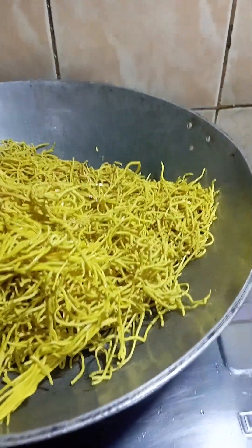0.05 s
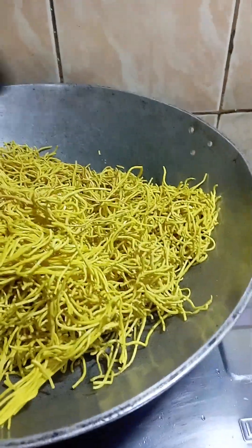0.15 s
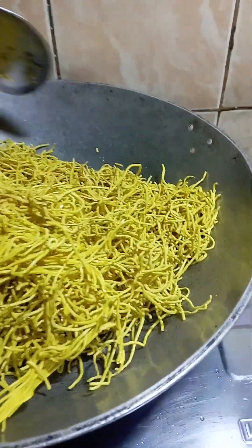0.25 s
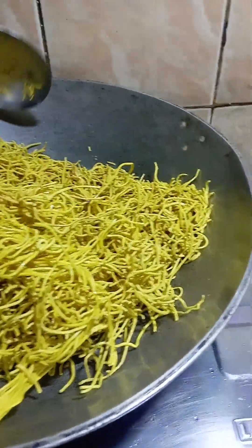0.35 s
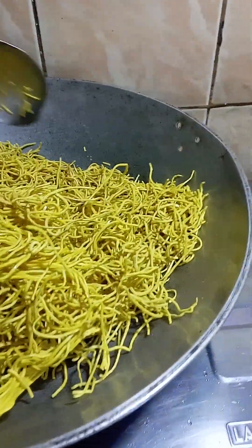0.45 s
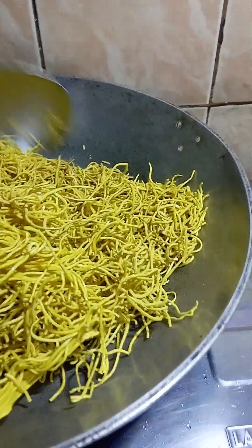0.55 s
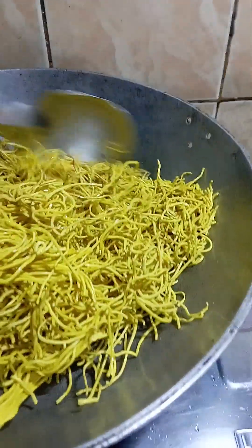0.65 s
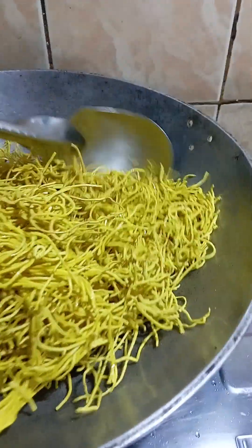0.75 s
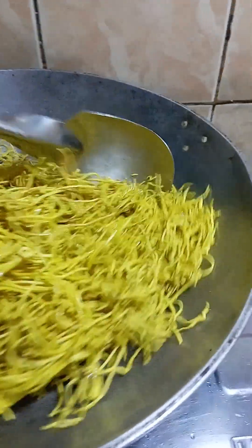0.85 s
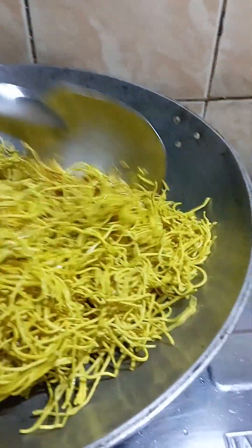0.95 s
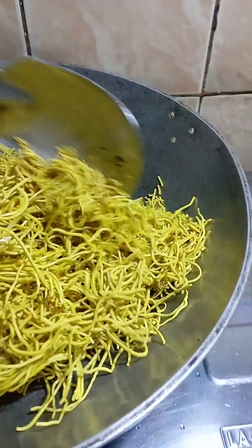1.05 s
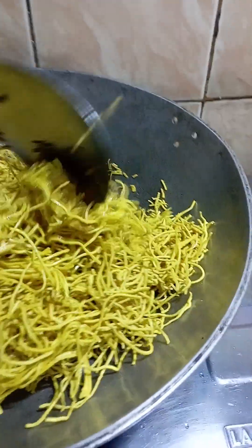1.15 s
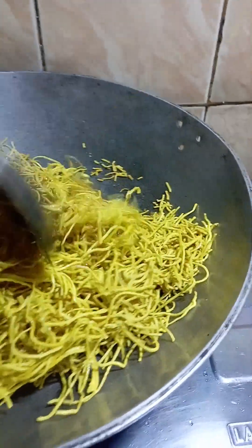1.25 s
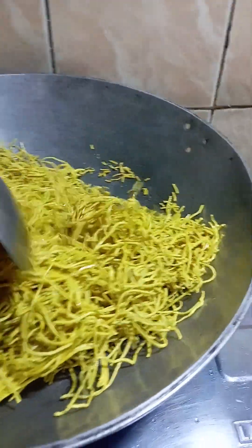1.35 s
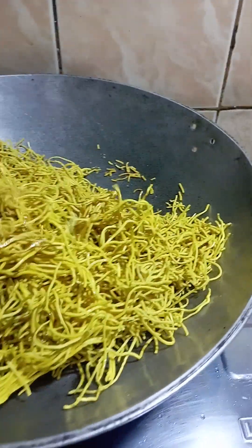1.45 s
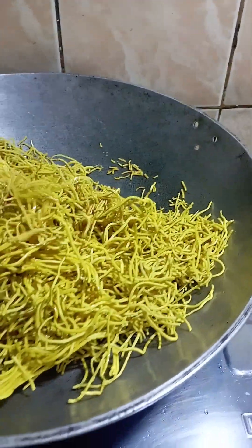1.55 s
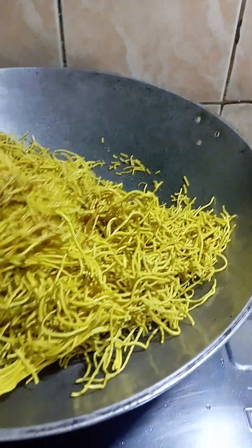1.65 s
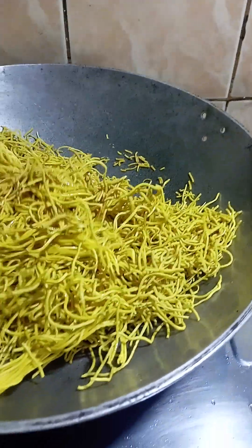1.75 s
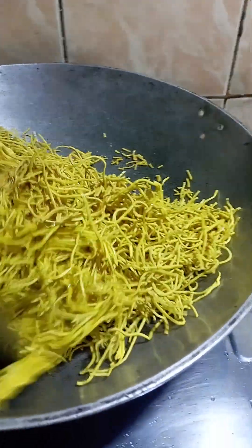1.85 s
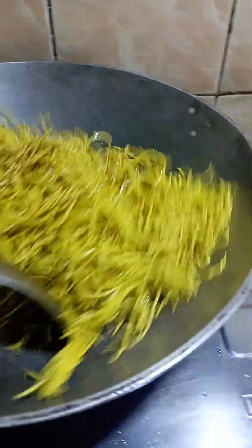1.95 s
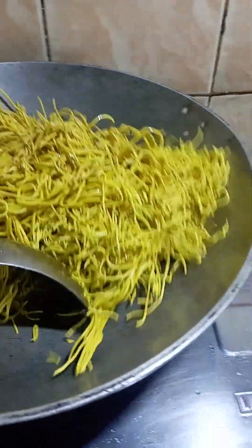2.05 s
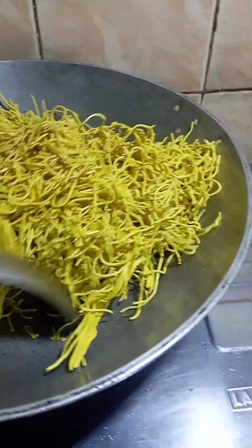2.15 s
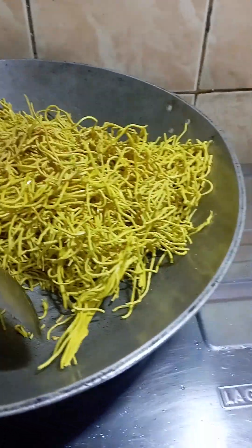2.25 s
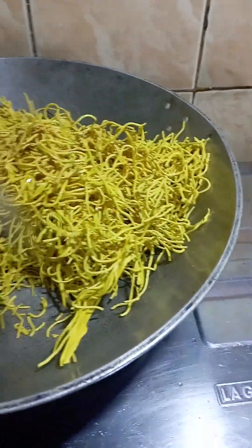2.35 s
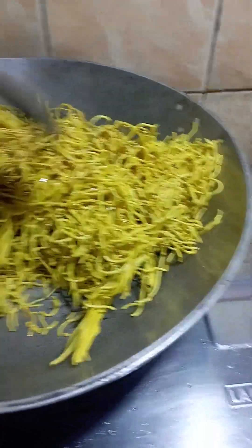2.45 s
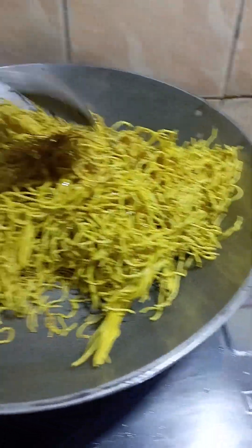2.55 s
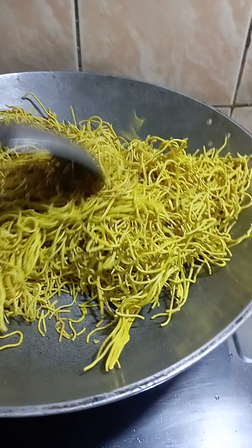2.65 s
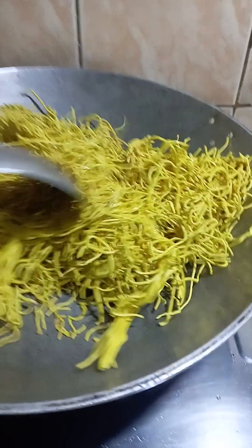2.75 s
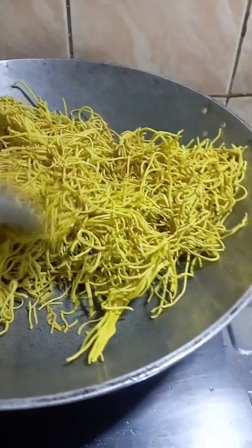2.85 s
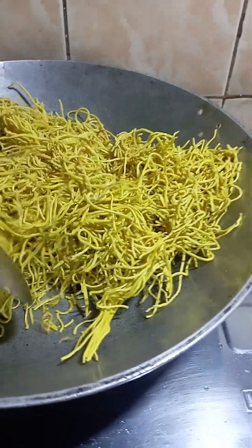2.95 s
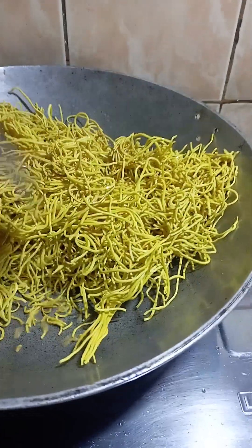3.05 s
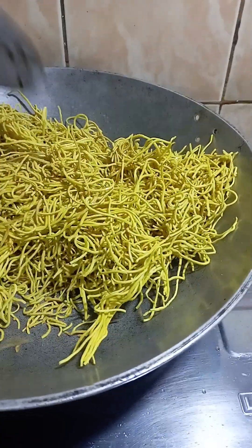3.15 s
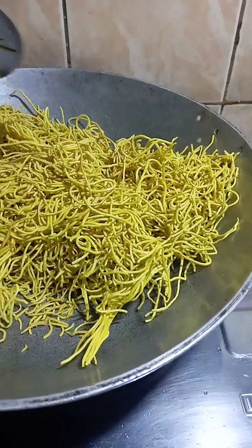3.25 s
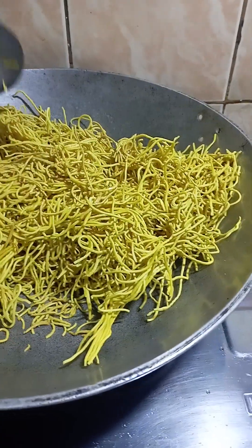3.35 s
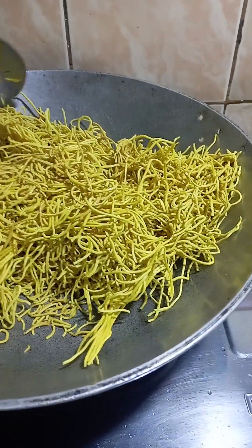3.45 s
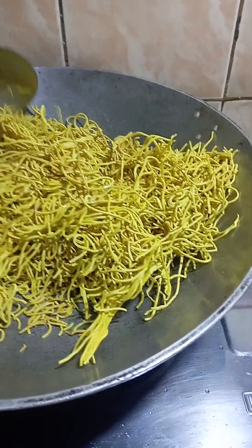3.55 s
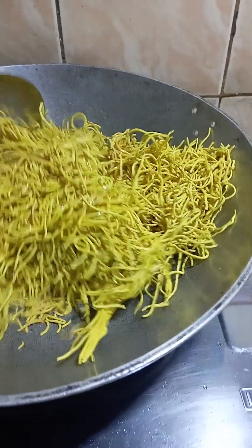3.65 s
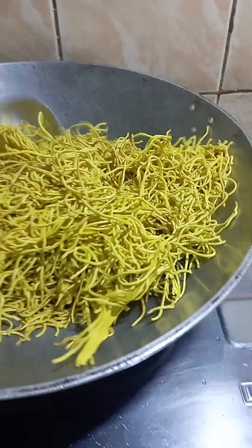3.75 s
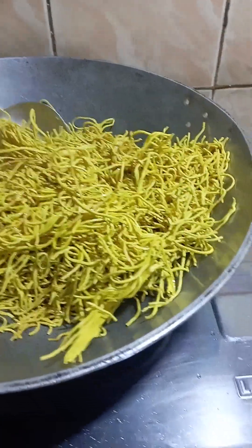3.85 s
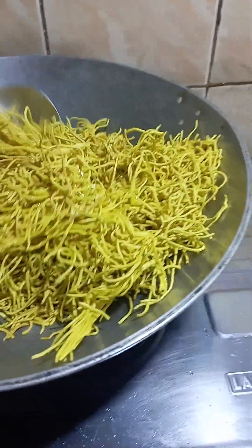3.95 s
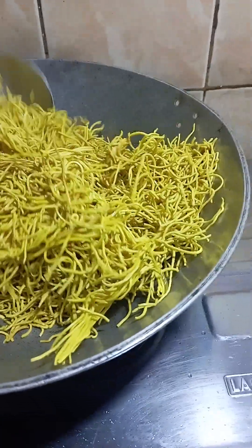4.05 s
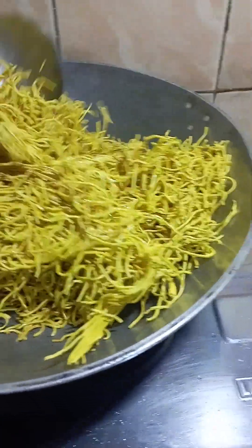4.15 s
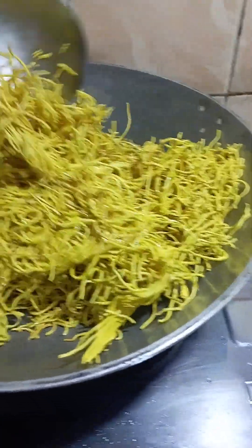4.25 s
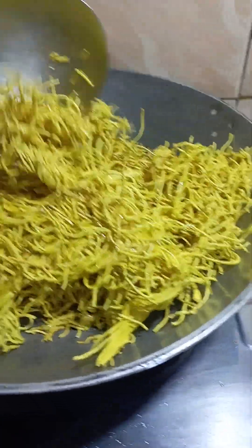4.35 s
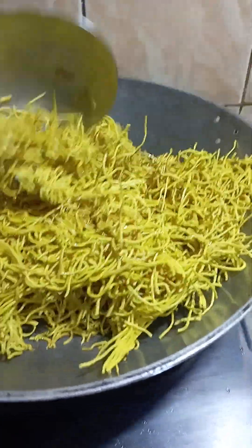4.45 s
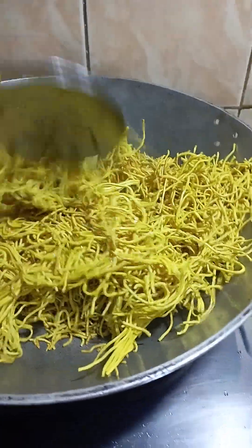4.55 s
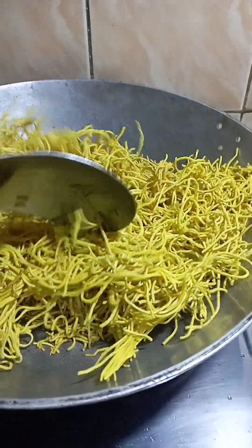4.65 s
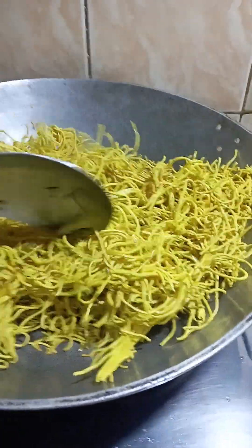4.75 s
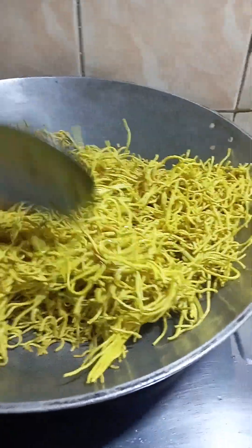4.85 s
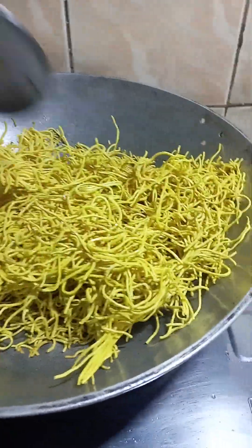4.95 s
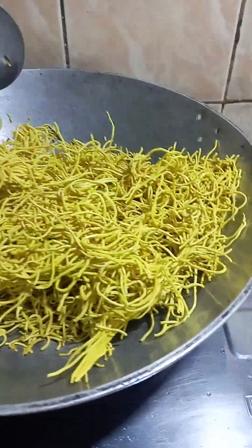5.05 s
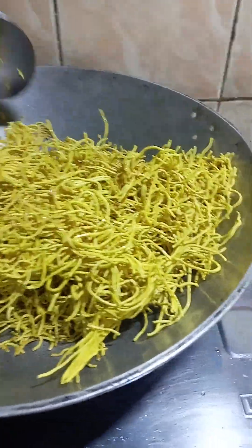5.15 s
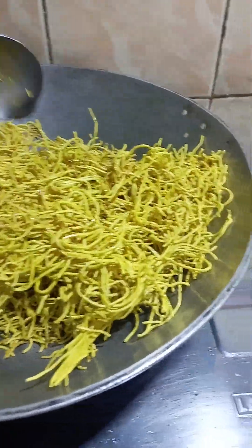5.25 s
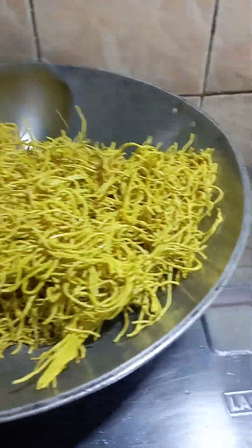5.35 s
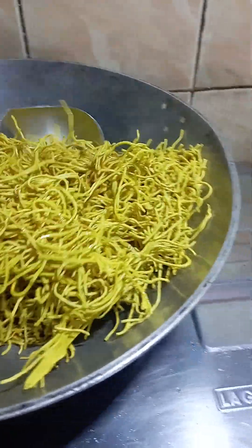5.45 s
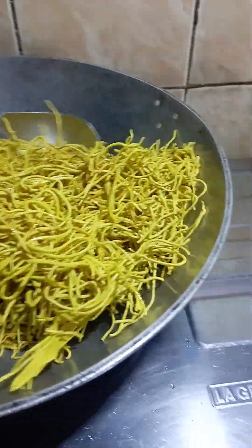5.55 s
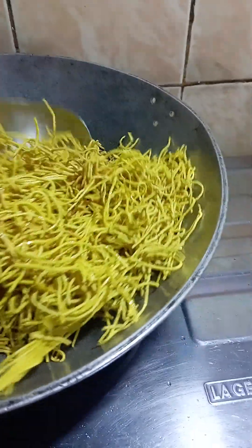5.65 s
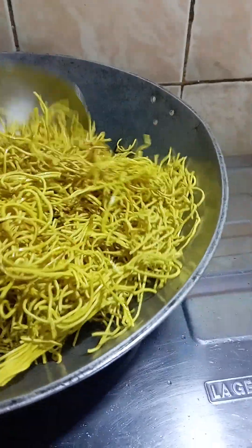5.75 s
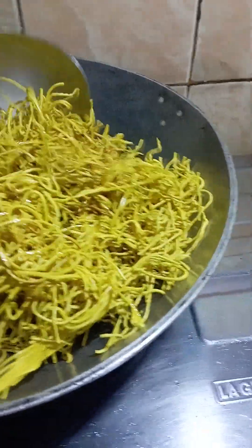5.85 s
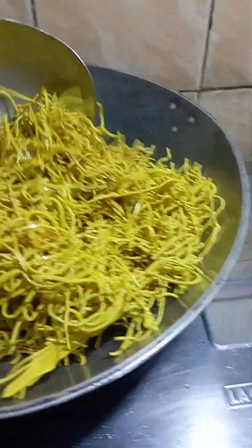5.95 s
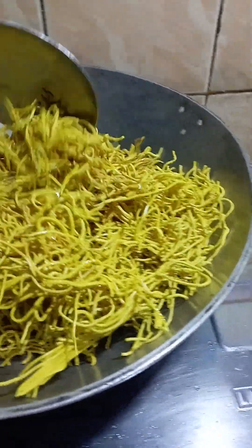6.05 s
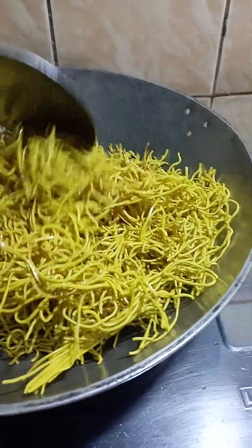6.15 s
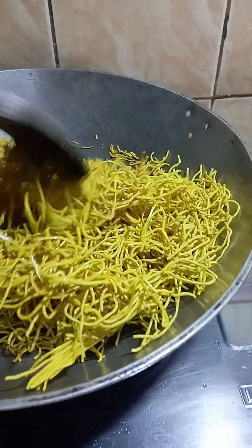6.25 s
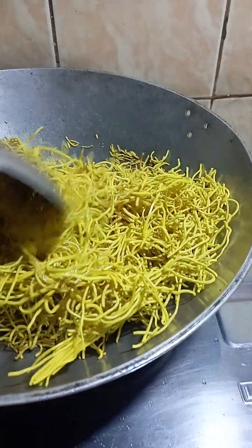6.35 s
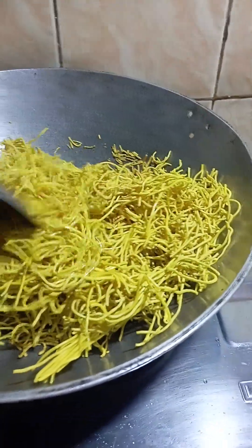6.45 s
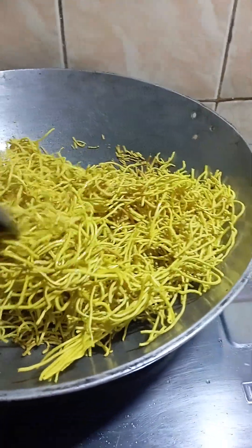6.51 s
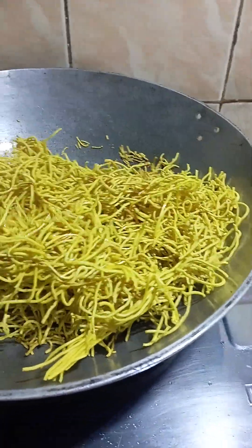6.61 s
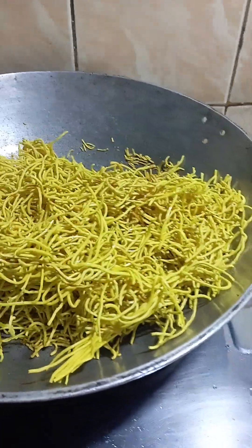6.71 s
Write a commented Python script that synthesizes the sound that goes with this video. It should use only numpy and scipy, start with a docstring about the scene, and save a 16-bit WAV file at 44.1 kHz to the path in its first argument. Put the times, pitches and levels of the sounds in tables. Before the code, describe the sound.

Close stereo pickup in a small tiled kitchen. A steel spatula strikes a thin wok and rasps along it, then noodles slide back with dry, crackly rustles. This repeats in four bouts, with small utensil ticks between. Faint fine sizzling and a low stove rush continue underneath.

```python
"""A tiled kitchen, a stereo microphone close by: noodles are turned in a thin metal wok with spatula and ladle.
In four bouts the spatula strikes the pan, and it scrapes along the metal: noise bursts, ringing modes, rough grains.
The lifted noodles slide back, rustling in clumps of crackles, and the utensils tick against each other.
Dragged metal sings softly, and landing noodles boom in the bowl. A faint sizzle of bubbles and the low rush
of the stove, filtered noise with wavering drones, go on throughout."""
import sys
import numpy as np
from scipy import signal
from scipy.fft import rfft, irfft, next_fast_len
from scipy.io import wavfile
from scipy.ndimage import map_coordinates

SR = 44100
rng = np.random.default_rng(int(sys.argv[2]) if len(sys.argv) > 2 else 0)


def unload_wav(signal):
    """Save mono or channel-first audio to the path in sys.argv[1] as 16-bit WAV at rate SR, clipped to [-1, 1]."""
    wavfile.write(
        sys.argv[1],
        SR,
        np.round(np.clip(np.atleast_2d(signal).T, -1, 1) * 32767).astype(np.int16),
    )


N = 298998  # length in samples


# Spectrum of the clash of steel on steel. Each row: frequency in Hz, relative density in dB per Hz.
CLASH_SPECTRUM = [(300, -41), (700, -5.5), (1000, -4.5), (1500, -5.5), (2000, 2), (2600, -11), (3400, 1),
                  (4600, 3.5), (6500, 0.5), (9000, 6), (11000, 7.5), (14000, -5), (16000, -6)]
# Spatula meets wok. Each row: start in seconds, clash, thud and clang levels in dB before the trims,
# clash t60 in seconds, thud's low and high edges in Hz, clang centre in Hz, clash tilt in dB per octave.
SPATULA_BLOWS = [(0.5261, -13.5, -33, -26, 0.18, 104, 674, 3480, -0.5),
                 (1.936, -14.5, -33.5, -39, 0.13, 118, 686, 884, 1.5),
                 (2.0948, -30.5, -35.5, -53, 0.26, 201, 1200, 980, -5.5),
                 (2.148, -42, -42, -50, 0.17, 320, 1060, 1960, 2),
                 (3.5454, -12, -28, -28, 0.19, 97, 690, 1820, 0.5),
                 (5.385, -31.5, -31, -44, 0.48, 105, 786, 1100, 1),
                 (5.5079, -15, -43, -31.5, 0.21, 108, 800, 2000, 1),
                 (5.5206, -16.5, -34, -22.5, 0.22, 400, 1510, 2390, 1)]


def blows(clash_trim_db=-1, thud_trim_db=3, clang_trim_db=0, thud_t60=0.34, bloom_s=0.0011,
          crack=0.35, crack_t60=0.011):
    """Each blow clashes and clangs at once; the bowl's low modes bloom just after."""
    out = np.zeros((2, N))
    t = np.arange(SR // 3) / SR
    attack = 1 - np.exp(-t / .0003)
    bloom = 1 - np.exp(-t / bloom_s)
    for start, clash_db, thud_db, clang_db, t60, low_hz, high_hz, centre_hz, tilt_db in SPATULA_BLOWS:
        dying = amp(-60 * t / t60) + crack * amp(-60 * t / crack_t60)
        noise = coloured(rng.standard_normal((2, len(t))), tilted(CLASH_SPECTRUM, tilt_db))
        clash = amp(clash_db + clash_trim_db) * noise * dying
        bowl = wok(rng.standard_normal((2, len(t))), low_hz, high_hz)
        thud = amp(thud_db + thud_trim_db - 60 * t / thud_t60) * bowl * bloom
        metal = (clash + amp(clang_db + clang_trim_db) * clang(t, centre_hz)) * attack
        # the metal leans left, the thud right
        add(out, start, metal * amp([[.7], [-.7]]) + thud * amp([[-1], [1]]))
    return out


# Resonances of the wok. Each row: frequency in Hz, width in Hz, relative level in dB.
WOK_MODES = [(123, 24, 0.5), (195.7, 13, 9), (233.5, 46, 3.5), (340, 70, -2), (416, 48, -1.5),
             (476.5, 42, 0), (559.5, 26.6, 3), (710, 140, -11.5), (817, 50, -3), (950, 50, -8),
             (1054, 76, -11), (1264, 55, -9.5), (1447, 190, -8.5), (1682, 60, -4), (1776, 81, -2),
             (1957, 152, 0.5), (2165, 43, -11.5), (2406, 5.4, -1.5), (2560, 140, -4.5), (2910, 110, -3),
             (3160, 35, 4.5), (3300, 19, -23), (3683, 16, 5.5), (3800, 110, -2.5)]


def clang(t, centre_hz, t60=0.17, octaves=0.38, scatter_db=-3.5):
    """The wok's modes ring freely; where the blade lands decides which of them speak most."""
    hz, _, db = np.transpose(WOK_MODES)
    favour = np.exp(-np.log2(hz / centre_hz) ** 2 / (2 * octaves ** 2))
    level = amp(db + scatter_db * rng.standard_normal((2, len(hz)))) * favour
    phase = 2 * np.pi * rng.random((2, len(hz), 1))
    ring = (level[..., None] * np.sin(2 * np.pi * hz[:, None] * t + phase)).sum(axis=1)
    return unit(ring) * amp(-60 * t / t60)


def wok(x, low_hz, high_hz):
    """The pan's resonances between two soft edges answer x, at rms 1."""
    def response(hz):
        modes = 0
        for k, (centre, width, db) in enumerate(WOK_MODES):
            damping = 1j * hz * width
            modes = modes + (-1) ** k * amp(db) * damping / (centre ** 2 - hz ** 2 + damping)
        edges = (1j * hz / (low_hz + 1j * hz)) ** 3 / (1 + 1j * hz / high_hz) ** 3
        return modes * edges
    return unit(filtered(spread(x), response))


# Spectrum of the rasping blade. Each row: frequency in Hz, relative density in dB per Hz.
RASP_SPECTRUM = [(530, -32), (900, -30), (1070, -36), (1260, -4), (1370, -32), (1900, -14), (2220, -20),
                 (2450, -10), (2760, -11.5), (4570, -3.5), (6800, -4), (10500, 0.5), (16000, -20.5)]
PUSH_ATTACK_S, PUSH_RELEASE_DB_PER_S = 0.051, 222
# The blade is pushed along the metal. Each row: start and end in seconds, rasp, pan body and grind levels
# in dB before the trims, easing in dB per second (negative builds up).
BLADE_PUSHES = [(0.599, 0.709, -27.5, -43.5, -32, 0), (0.728, 0.836, -32, -38, -42.5, 12),
                (1.981, 2.131, -28, -49, -43, 10), (3.632, 3.863, -31, -41.5, -39.5, 3),
                (5.377, 5.416, -32, -52, -36.5, 0), (5.449, 5.523, -32, -38, -63, -5)]


def scrape(rasp_trim_db=0, body_trim_db=-2, grind_trim_db=-5, clump_db=1.3):
    """The blade sticks and slips on the pan: clumps of catches rasp in the steel, grind and shake the bowl."""
    gains = np.zeros((3, N))
    for start, end, *levels, easing in BLADE_PUSHES:
        push = stroke(start, end, easing, PUSH_ATTACK_S, PUSH_RELEASE_DB_PER_S)
        gains += amp(levels)[:, None] * push
    rasp, body, grind = gains
    catches = grains(2000, 4.1) * amp(clump_db * wobble(90))
    edge = coloured(sheet(catches, t60=.05, direct=.7), RASP_SPECTRUM)
    shaking = sheet(catches, t60=0.047, direct=0.51)
    bowl = amp(body_trim_db) * body * wok(shaking, 172, 1040) * amp([[-1], [1]])
    grinding = amp(grind_trim_db) * grind * wok(shaking, 650, 1610)
    return amp(rasp_trim_db) * rasp * edge + bowl + grinding


def stroke(start, end, easing_db, attack, release_db):
    """Gain of one arm movement: it leans in, eases off steadily (or builds up) and dies away after its end."""
    t = np.arange(N) / SR
    held = np.clip(t, start, end) - start
    lean_in = np.clip((t - start) / attack, 0, 1)
    return lean_in * amp(-easing_db * held - release_db * np.maximum(t - end, 0))


# Spectra of sliding noodles and of the brushing blade. Each row: frequency in Hz, relative density in dB per Hz.
RUSTLE_SPECTRUM = [(300, -65), (2000, -27.5), (3100, -16), (6000, -24.5), (7800, -21.5), (9000, -5.5),
                   (10600, 0.5), (12300, -8.5), (14500, -14.5), (16000, -22)]
BRUSH_SPECTRUM = [(200, -72), (1200, -15), (2800, -6.5), (4400, 0), (6500, 1.5), (8500, 0.5), (12000, -11),
                  (16000, -33)]


def noodles(rustle_trim_db=0, brush_trim_db=-1, ring_trim_db=-3, flutter_db=1.74):
    """Oily strands slide on hot metal in clumps of crackles; the blade brushes through, the pan rings faintly."""
    def crackles(t60):
        return sheet(grains(1600, 6.0) * amp(2.5 * wobble(60)), t60, direct=0.24)

    brush, rustle, ring = handling()
    hiss = amp(rustle_trim_db) * rustle * coloured(crackles(0.042), RUSTLE_SPECTRUM) * amp([[.6], [-.6]])
    blade = amp(brush_trim_db) * brush * coloured(crackles(0.08), BRUSH_SPECTRUM)
    pan = amp(ring_trim_db) * ring * wok(crackles(0.028), 610, 4100)
    return hiss + amp(flutter_db * wobble(22)) * (blade + pan)


STIR_ATTACK_S, STIR_RELEASE_DB_PER_S = 0.065, 82
SLIDE_RING_DB = -18  # pan ring relative to a slide's rustle, before the trims
# The blade ploughs through the heap. Each row: start and end in seconds, brushing, rustle and pan ring levels
# in dB before the trims, easing in dB per second (negative builds up).
BLADE_STIRS = [(0.81, 1.016, -38.5, -38, -49.5, 26), (1.045, 1.526, -51, -42, -57, 5),
               (1.71, 1.92, -56.5, -51, -57, -19), (2.133, 2.4, -49, -41, -51.5, 32),
               (2.652, 3.156, -47.5, -42.5, -56, 2), (3.913, 4.622, -55, -50, -59, -4),
               (4.633, 4.972, -50, -45.5, -56, -6), (5.54, 5.908, -40, -40.5, -51, 21),
               (5.937, 6.613, -52.5, -48.5, -55.5, 3)]
# A clump slides over the hot metal. Each row: peak time in seconds, rise and fall in seconds per 20 dB,
# rustle and brushing levels in dB before the trims.
NOODLE_SLIDES = [(0.795, 0.21, 0.061, -27, -43), (1.1, 0.095, 0.082, -36, -46), (1.3, 0.12, 0.12, -31, -49),
                 (1.45, 0.12, 0.11, -37.5, -46.5), (1.94, 0.041, 0.11, -23, -30),
                 (2.74, 0.18, 0.2, -37.5, -57), (2.895, 0.066, 0.11, -30.5, -37),
                 (3.0, 0.15, 0.1, -24, -42), (3.87, 0.11, 0.06, -27.5, -38), (4.21, 0.095, 0.08, -48, -49),
                 (4.34, 0.06, 0.061, -39, -40.5), (4.73, 0.12, 0.058, -24, -38),
                 (4.89, 0.051, 0.1, -29.5, -40), (4.976, 0.11, 0.06, -34, -39.5),
                 (6.055, 0.08, 0.11, -39, -42), (6.21, 0.08, 0.08, -54, -45.5),
                 (6.42, 0.058, 0.043, -42, -44), (6.56, 0.18, 0.14, -35, -44.5)]


def handling():
    """Strengths of brushing, rustle and pan ring: stirs and slides add in power."""
    power = np.zeros((3, N))
    for start, end, *levels, easing in BLADE_STIRS:
        stir = stroke(start, end, easing, STIR_ATTACK_S, STIR_RELEASE_DB_PER_S)
        power += (amp(levels)[:, None] * stir) ** 2
    for peak, rise, fall, rustle_db, brush_db in NOODLE_SLIDES:
        levels = amp([[brush_db], [rustle_db], [rustle_db + SLIDE_RING_DB]])
        power += (levels * swell(peak, rise, fall)) ** 2
    return np.sqrt(power)


def swell(peak, rise, fall):
    """Gain of a sliding clump: it gathers speed, then comes to rest."""
    t = np.arange(N) / SR - peak
    return amp(-20 * np.maximum(-t / rise, t / fall))


# Spectrum of a tick before its tilt. Each row: frequency in Hz, relative density in dB per Hz.
TICK_SPECTRUM = [(150, -103), (1000, -47), (2800, -20.5), (4300, -5), (6500, -4.5), (9000, 1.5), (11000, 1),
                 (13000, -11.5), (16000, -16.5)]
# Light touches of the utensils. Each row: start in seconds, level in dB before the trim, tilt in dB per octave.
UTENSIL_TICKS = [(1.1715, -31.5, 5), (1.2296, -31, 11), (1.294, -28, 3), (1.529, -39, 13),
                 (1.7439, -29, -3.5), (1.8793, -29, 2.5), (2.2635, -39, -7), (2.445, -32, 2),
                 (2.558, -35, 1.5), (2.588, -40.5, -14.5), (2.962, -26, 14), (3.006, -21, 5),
                 (3.084, -28.5, 0.3), (3.1338, -25.5, 3.5), (3.159, -25, 2), (3.2147, -30.5, 0.3),
                 (3.68, -19, 11), (4.2247, -35, 5), (4.3155, -34, -10.5), (4.359, -41, 3),
                 (4.4385, -35, -5), (4.8, -21.5, 2), (4.8705, -26, 1), (4.8762, -16, 3.5),
                 (4.9265, -17.5, 1.5), (5.1042, -28.5, -1.5), (5.269, -37.5, 1), (5.962, -35.5, -7.5),
                 (6.0334, -31.5, -1), (6.1925, -32, -11.5), (6.2333, -26.5, 5.5), (6.482, -24.5, 12)]


def ticks(trim_db=-2, t60=0.041, tail_db=-14, tail_t60=0.39, rise_s=0.00071):
    """Small contacts, quickly damped by the noodles down to a faint tail."""
    out = np.zeros((2, N))
    t = np.arange(SR // 5) / SR
    shape = (amp(-60 * t / t60) + amp(tail_db - 60 * t / tail_t60)) * (1 - np.exp(-t / rise_s))
    for start, db, tilt_db in UTENSIL_TICKS:
        noise = coloured(rng.standard_normal((2, len(t))), tilted(TICK_SPECTRUM, tilt_db))
        add(out, start, amp(db + trim_db) * shape * noise)
    return out


# The dragged ladle keeps one resonance of the pan singing.
# Each row: start and end in seconds, frequency in Hz, level in dB before the trim.
SINGING_MODES = [(0.62, 0.78, 1920, -55), (0.63, 0.76, 2475, -44.5), (1.034, 1.323, 2026, -59),
                 (1.351, 1.613, 1620, -64), (2.058, 2.245, 1936, -51.5), (2.203, 2.341, 1630, -63),
                 (2.65, 3.079, 1603, -55), (2.86, 3.06, 2140, -55), (3.982, 4.421, 1940, -68.5),
                 (5.599, 6.302, 1950, -62), (5.6, 6.3, 1488, -68), (6.39, 6.64, 3100, -53.5)]


def singing(trim_db=1, width_hz=32, flutter_db=1.3):
    """Friction feeds a single mode of the pan, swelling and fading with the drag."""
    out = np.zeros((2, N))
    for start, end, centre_hz, db in SINGING_MODES:
        u = np.linspace(0, 1, max(round((end - start) * SR), SR // 20))
        noise = rng.standard_normal((2, len(u)))
        mode = filtered(noise, lambda hz: 1 / (1 + ((hz - centre_hz) / width_hz) ** 2))
        add(out, start, amp(db + trim_db) * unit(mode) * np.sqrt(4 * u * (1 - u)))
    return out * amp(flutter_db * wobble(30))


# The heap lands on the bowl. Each row: start in seconds, level in dB before the trim.
HEAP_LANDINGS = [(1.377, -49.5), (1.469, -67), (1.925, -42.5), (3.562, -59), (4.2, -70), (5.421, -50)]


def landings(trim_db=2, centre_hz=108, width_hz=28, swell_s=0.038):
    """Soft falling noodles wake only the deepest boom of the wok."""
    out = np.zeros((2, N))
    t = np.arange(SR // 3) / SR
    shape = t / swell_s * np.exp(1 - t / swell_s)
    for start, db in HEAP_LANDINGS:
        noise = rng.standard_normal((1, len(t)))
        boom = filtered(noise, lambda hz: np.exp(-((hz - centre_hz) / width_hz) ** 2))
        add(out, start, amp(db + trim_db) * unit(boom) * shape)
    return out


SIZZLE_DB = -47.5
# Spectrum of the sizzle. Each row: frequency in Hz, relative density in dB per Hz.
SIZZLE_SPECTRUM = [(530, -36.5), (900, -24.5), (1150, -15.5), (1600, -14.5), (2120, -16), (2420, -15.5),
                   (2760, -14), (3730, -15.5), (4410, -9), (6110, -12), (10800, 2.5), (12400, -4),
                   (15100, -6.5), (16000, -24)]


def sizzle():
    """Moisture bursts in countless tiny bubbles under the heap."""
    bubbles = np.array([grains(7000, 4), grains(7000, 3.8)])
    bubbles = bubbles + .5 * rng.standard_normal((2, N))
    level = amp(SIZZLE_DB + 0.13 * wobble(8))
    return level * coloured(bubbles, SIZZLE_SPECTRUM) * amp([[.7], [-.7]])


STOVE_DB = -57.5
# Spectrum of the stove's rush. Each row: frequency in Hz, relative density in dB per Hz.
STOVE_SPECTRUM = [(15, -61), (25, -27), (49, -18), (60, -24), (118, -6), (151, -13), (199, -16), (234, -7),
                  (284, -5.5), (334, -15), (362, -6), (419, -12), (500, -15.5), (800, -23), (1200, -33),
                  (1560, -73.5), (2640, -120)]
# Wavering drones of the kitchen. Each row: frequency in Hz, width in Hz, level in dB.
KITCHEN_DRONES = [(75, 9.1, -68.5), (112.2, 11, -60), (360, 6, -66)]


def stove():
    """A low steady rush of filtered noise with a few wavering drones."""
    rush = coloured(spread(rng.standard_normal((2, N))), STOVE_SPECTRUM)
    rush = rush * amp(STOVE_DB + 2.1 * wobble(5.25))
    return rush + sum(amp(db) * drone(hz, width) for hz, width, db in KITCHEN_DRONES)


def drone(hz, width):
    """One resonance under random drive, drifting in level and phase, at rms 1."""
    drift = wobble(width) + 1j * wobble(width)
    return unit(np.real(drift * np.exp(2j * np.pi * hz * np.arange(N) / SR)))


# Decay of the tiled room. Each row: frequency in Hz, t60 in seconds.
ROOM_DECAY = [(150, 0.28), (700, 0.2), (3000, 0.43), (12000, 0.12)]


def kitchen(x):
    """The tiled walls answer 4 ms later with decaying noise; the top treble dies first."""
    hz, t, bins = signal.stft(rng.standard_normal((2, SR // 2)), SR, nperseg=256)
    t60 = along(ROOM_DECAY, hz)[:, None]
    tail = signal.istft(bins * amp(-60 * t / t60), SR, nperseg=256)[1]
    tail = np.pad(tail / np.linalg.norm(tail[0]), ((0, 0), (SR // 250, 0)))
    return signal.fftconvolve(x, tail, axes=1)[:, :N]


def grains(rate, scatter_db):
    """Tiny impulses at random times, so many a second, of random sizes and signs."""
    chance, size = rng.random(N), rng.standard_normal(N)
    sign = np.sign(rng.standard_normal(N))
    return (chance < rate / SR) * sign * amp(scatter_db * np.clip(size, -2, 2))


def sheet(x, t60, direct, count=5):
    """Thin metal smears each impulse over countless close modes; their mix drifts as the contact moves."""
    t = np.arange(SR // 6) / SR
    ring = rng.standard_normal((count, 2, len(t))) * amp(-60 * t / t60)
    ring /= np.linalg.norm(ring, axis=2, keepdims=True)
    share = np.array([wobble(7) for _ in range(count)])
    share /= np.linalg.norm(share, axis=0)
    rung = signal.oaconvolve((x * share)[:, None], ring, axes=2)[..., :N].sum(axis=0)
    # the direct impulses reach the right channel three samples later
    return unit(rung + direct * np.array([x, np.roll(x, 3)]))


# Likeness of left and right at the microphone. Each row: frequency in Hz, correlation from 0 to 1.
STEREO_LIKENESS = [(100, 0.8), (280, 0.89), (550, 0.26), (1500, 0), (4000, 0), (15000, 0)]


def spread(pair):
    """Two unrelated signals become left and right: alike in the bass, apart in the treble."""
    def mid_side(hz):
        turn = np.arccos(np.clip(along(STEREO_LIKENESS, hz), -1, 1)) / 2
        return np.array([np.cos(turn), np.sin(turn)])
    mid, side = filtered(pair, mid_side)
    return np.array([mid + side, mid - side])


def tilted(spectrum, tilt_db):
    """A sharper contact lifts the treble by so many dB an octave."""
    return [(hz, db + tilt_db * np.log2(hz)) for hz, db in spectrum]


def coloured(x, spectrum):
    """x shaped by a spectrum, at rms 1."""
    return unit(filtered(x, lambda hz: amp(along(spectrum, hz))))


def filtered(x, response):
    """x times a response of frequency."""
    n = x.shape[-1]
    m = next_fast_len(n + SR // 4)
    return irfft(rfft(x, m) * response(np.fft.rfftfreq(m, 1 / SR)), m)[..., :n]


def wobble(rate):
    """A smooth random curve, rate knots a second."""
    return map_coordinates(rng.standard_normal(int(N * rate / SR) + 4), [np.arange(N) * rate / SR])


def along(points, hz):
    """Read (Hz, value) points on a log axis."""
    f, v = np.transpose(points)
    return np.interp(np.log(hz + 1), np.log(f), v)


def amp(db):
    """Decibels to gain."""
    return 10 ** (np.asarray(db) / 20)


def unit(x):
    """Scale to rms 1."""
    return x / np.sqrt(np.mean(x ** 2) + 1e-20)


def add(track, start, sound):
    """Mix a sound in at a time in seconds."""
    part = track[:, round(start * SR):][:, :sound.shape[1]]
    part += sound[:, :part.shape[1]]


def scene(room_db=-12):
    """The cooking in its room, over the sizzle and the stove."""
    cooking = blows() + scrape() + noodles() + ticks() + singing() + landings()
    return cooking + amp(room_db) * kitchen(cooking) + sizzle() + stove()


TOP_HZ = 16000  # middle of a 200 Hz wide slope


def record(dry):
    """The recorder keeps nothing above its band limit."""
    return filtered(dry, lambda hz: np.clip((TOP_HZ - hz) / 200 + .5, 0, 1))


dry = scene()
out = record(dry)
unload_wav(out)
```